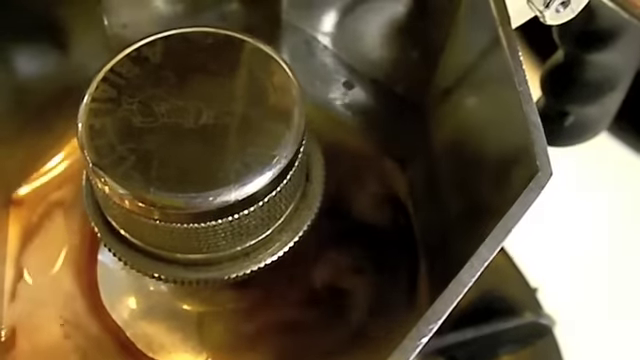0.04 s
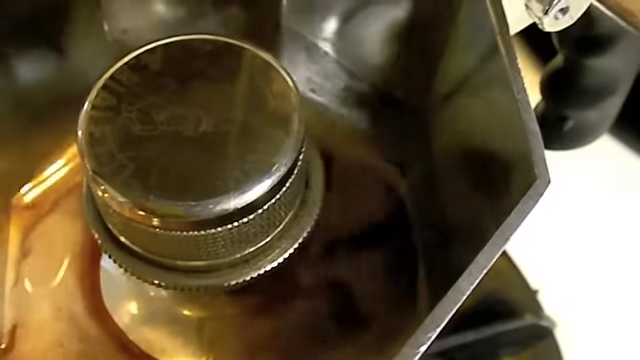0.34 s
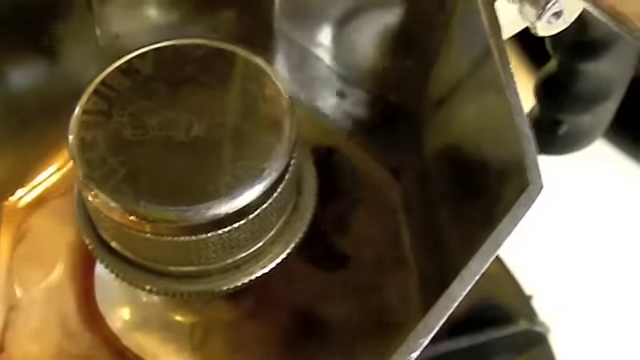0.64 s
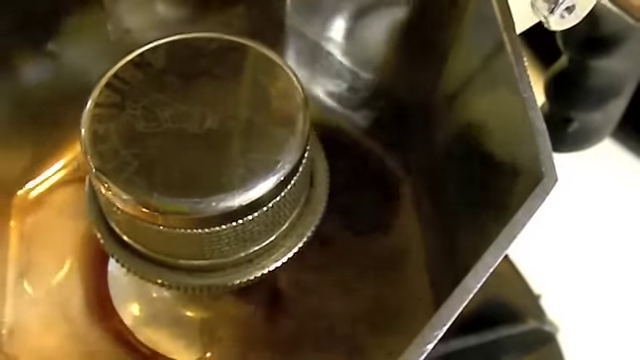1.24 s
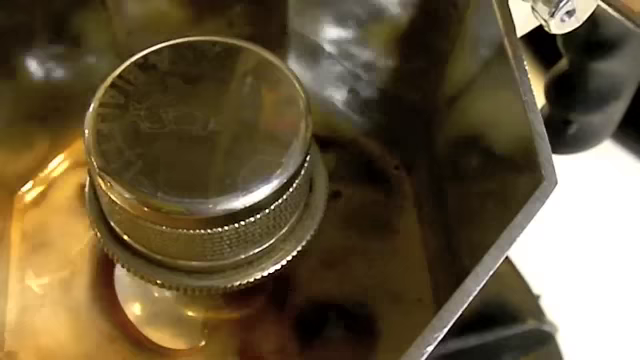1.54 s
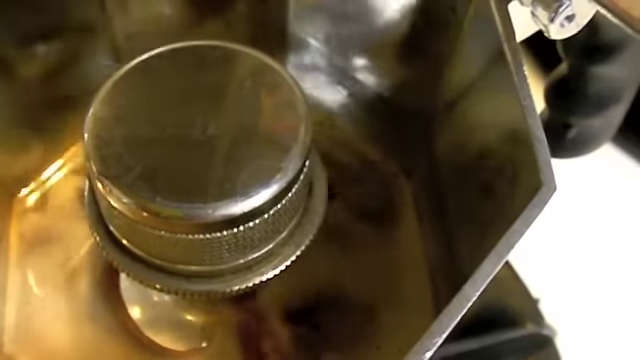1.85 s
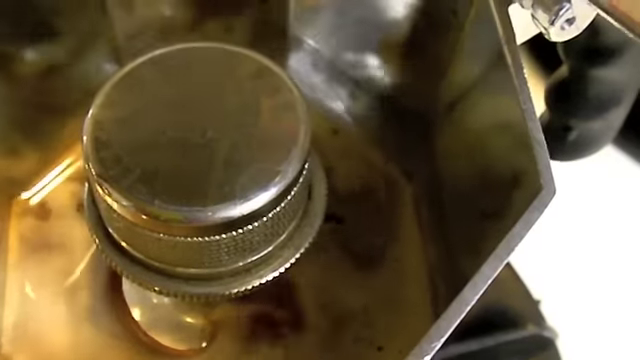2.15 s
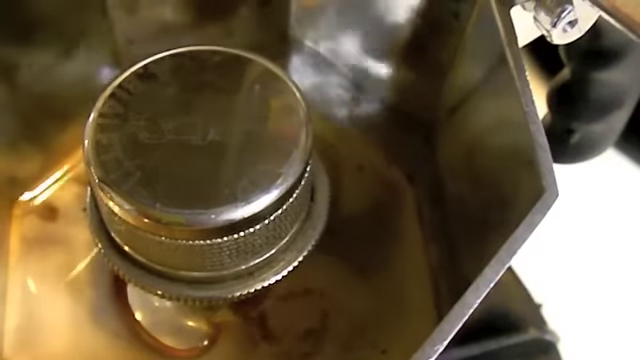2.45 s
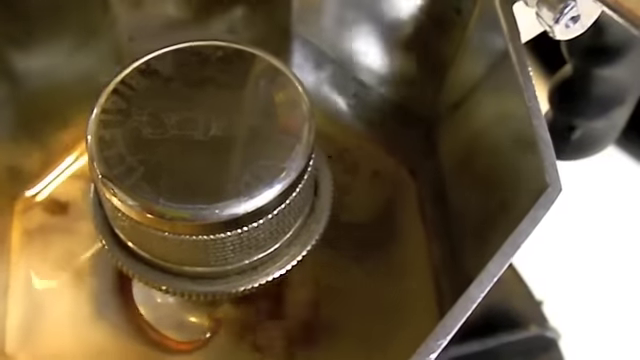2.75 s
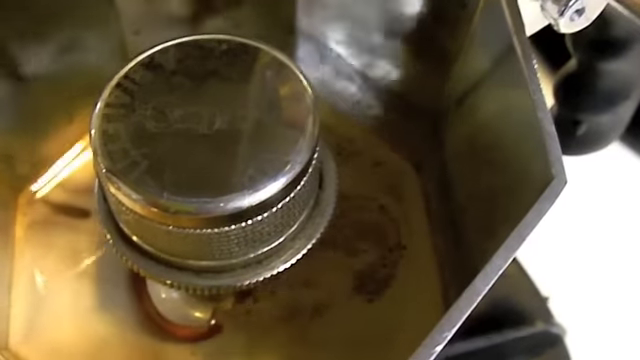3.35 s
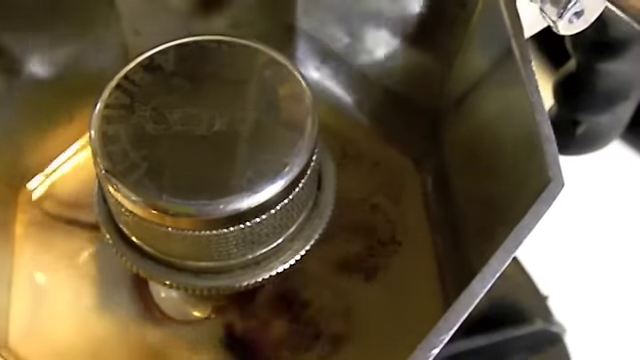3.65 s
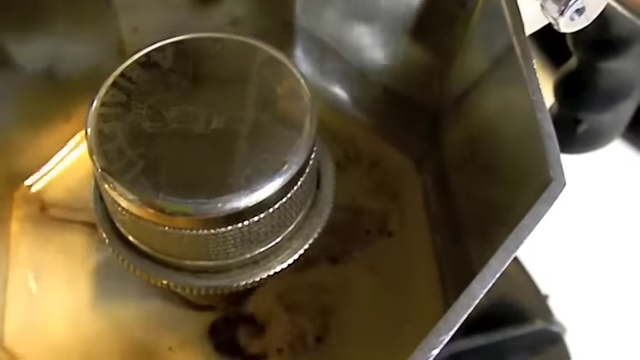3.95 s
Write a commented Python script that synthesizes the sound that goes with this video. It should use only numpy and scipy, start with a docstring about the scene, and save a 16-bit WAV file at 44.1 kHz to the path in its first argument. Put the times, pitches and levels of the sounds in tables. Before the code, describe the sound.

Coffee gurgles and spits in a stovetop pot before easing into a simmering hiss.

```python
"""Bubbles pop and gurgle as slugs of coffee choke the spout of a stovetop pot; spray crackles and
steam squeezes past in hoarse whistles. The last plug of liquid tears with a crack and, after a last
big pop, the spout drains with a rising rush. The steam settles into a steady, simmering hiss.
Heard in a quiet kitchen, from a stereo pair of microphones just above the open lid."""
import sys
import numpy as np
from scipy import signal
from scipy.fft import rfft, irfft
from scipy.io import wavfile
from scipy.ndimage import uniform_filter1d

SR = 44100
rng = np.random.default_rng(int(sys.argv[2]) if len(sys.argv) > 2 else 0)


def file_out(sig):
    """Save sig as 16-bit WAV at sys.argv[1]."""
    # one column per channel
    cols = np.atleast_2d(sig).T
    # limit, then scale
    lim = np.clip(cols, -1, 1)
    pcm = np.round(lim * 32767).astype(np.int16)
    wavfile.write(sys.argv[1], SR, pcm)


N = 176400
TIME, FREQS = np.arange(N) / SR, np.fft.rfftfreq(N, 1 / SR)

# small bubbles between the pops: t/s, level/dB
GURGLE_LEVEL = [(0.0, -25.5), (0.04, -29.5), (0.1, -33), (0.108, -40), (0.144, -29.5), (0.22, -32.5),
                (0.251, -24), (0.267, -36.5), (0.303, -26), (0.315, -40), (0.385, -28), (0.402, -32),
                (0.418, -29), (0.452, -38.5), (0.483, -26), (0.567, -31), (0.583, -26.5), (0.774, -33.5),
                (0.814, -28.5), (0.854, -31.5), (0.91, -29.5), (0.922, -43.5), (0.986, -26), (1.018, -36.5),
                (1.042, -30.5), (1.101, -32.5), (1.185, -26.5), (1.197, -35.5), (1.225, -32), (1.257, -33)]
# resonance of the steam pocket in the spout: t/s, f/Hz
POCKET_PITCH = [(0, 1550), (.1, 1600), (.15, 1940), (.222, 1530), (.33, 2280), (.385, 1750), (.49, 1850),
                (.56, 1580), (.95, 1470), (1.25, 1380)]
# how dry the spout is: t/s, dryness (0-1)
SPOUT_DRYNESS = [(0, 0.7), (.5, 0), (.58, 0.9), (1.1, 0.97), (1.16, 0.6)]
# churning liquid: f/Hz, level/dB
CHURN_SPECTRUM = [(150, -28.5), (290, -4), (600, -7), (720, 2), (2200, 2), (2850, -5), (3150, 2.5),
                  (3600, -2), (4400, -2), (6300, -16.5), (15000, -18)]
# steam squeezing past the liquid: t/s, level/dB
WHISTLE_LEVEL = [(0.0, -35.5), (0.108, -61), (0.14, -40.5), (0.315, -51.5), (0.335, -44.5), (0.459, -54),
                 (0.519, -39), (0.531, -44), (0.595, -28), (0.603, -37), (0.662, -39.5), (0.686, -25),
                 (0.758, -48.5), (0.802, -36), (0.898, -38.5), (0.918, -49), (0.958, -54), (0.966, -31),
                 (0.994, -32.5), (1.01, -40), (1.046, -36), (1.121, -46.5), (1.185, -34), (1.193, -54),
                 (1.217, -60)]
# resonances of the gap it passes through: f/Hz, half-width/Hz, level/dB
GAP_MODES = [(4620, 130, -6.5), (5100, 150, 2.5), (5365, 220, -4.5)]
# atomised coffee: t/s, level/dB
MIST_LEVEL = [(0.5, -51), (0.607, -49), (0.72, -36.5), (0.765, -44), (0.8, -37.5), (0.9, -42), (0.95, -62),
              (0.986, -42), (1.121, -64)]
# its tone: f/Hz, level/dB
MIST_SPECTRUM = [(5500, -42), (8600, -7), (9800, -17), (10800, 4), (11500, 4), (12600, -7), (13300, -9),
                 (14100, -13), (14750, -4), (15100, -2), (15500, -14)]
# jets of wet steam: t/s, length/s, f/Hz, width/Hz, level/dB
STEAM_JETS = [(0, .26, 12800, 1390, -41.5), (0.043, 0.046, 12700, 990, -30.5),
              (0.132, 0.041, 13400, 900, -37.5), (.255, 0.18, 14400, 600, -39.5),
              (0.285, 0.02, 12400, 1900, -31.5), (0.303, 0.11, 10300, 1300, -42.5),
              (.465, 0.05, 14000, 600, -36), (1.151, 0.019, 12200, 1300, -36),
              (1.172, 0.018, 12400, 1510, -24.5)]
# steady steam: t/s, level/dB
HISS_LEVEL = [(0, -48), (1.15, -37), (1.27, -35), (1.6, -35), (2.3, -35.5), (2.6, -33), (2.75, -35),
              (3.3, -34.5), (4, -35)]
# its tone: f/Hz, level/dB
HISS_SPECTRUM = [(40, -52), (120, -34.5), (190, -18), (280, -8.5), (600, -7), (720, 1), (1150, -2.5),
                 (1400, 1.5), (1900, -0.5), (3200, -5.5), (4200, -12), (5500, -12.5), (6600, -10.5),
                 (7300, -23), (8900, -17.5), (12500, -18), (15000, -37)]
# extra wet steam as the spout clears: t/s, level/dB
WET_SURGE_LEVEL = [(0, -71), (1.18, -71), (1.25, -28.5), (1.45, -31.5), (1.6, -30.5), (1.85, -33),
                   (2.1, -36), (2.35, -39), (2.7, -77), (4, -72)]
# its tone: f/Hz, level/dB
WET_SURGE_SPECTRUM = [(60, -55), (300, -26), (500, -21), (800, -13), (950, -7.5), (1330, -2.5), (1700, -6),
                      (1950, -9), (5200, -15.5), (7000, -29.5), (10000, -24), (12800, -22.5), (14000, -47)]
# air resonances of the open pot: f/Hz, half-width/Hz, boost/dB
POT_AIR_MODES = [(286, 12, 7), (411, 18, 5), (492, 33, 4), (721, 17, 7), (996, 90, 5.5), (1321, 82, 6.5),
                 (1475, 25, 5.5), (1712, 25, 6.5), (3230, 51, 6), (3764, 28, 7.5), (5210, 60, 5),
                 (6030, 24, 11.5)]
# bands in which the froth fizzes: f/Hz
FROTH_BANDS = [2460, 4600, 6730, 8620, 10920, 13300]
# flurries of fine droplets: t/s, half-length/s, f/Hz, relative half-width, level/dB
DROPLET_FLURRIES = [(2.635, 0.005, 3150, 0.083, -33), (2.964, 0.023, 9200, 0.47, -45),
                    (3.366, 0.0094, 3730, 0.091, -35), (3.468, 0.021, 5200, 0.15, -39),
                    (3.876, 0.14, 11100, 0.14, -46.5)]
# room tone: f/Hz, level/dB
KITCHEN_SPECTRUM = [(55, -36), (75, 3.5), (95, -1), (165, -2.5), (195, 14), (230, -38), (2000, -50)]
# large bubbles bursting at the spout: t/s, ring level/dB, f/Hz, decay/s, snap level/dB
LARGE_BUBBLES = [(0.0161, -12.5, 1500, 0.0018, -33), (0.074, -23, 1760, 0.0021, -17),
                 (0.0814, -13.5, 1650, 0.0015, -11), (0.085, -11.5, 1620, 0.0011, -15),
                 (0.1425, -9, 1640, 0.0005, -33), (0.154, -16, 1770, 0.0005, -18),
                 (0.1612, -8, 1810, 0.0005, -16), (0.228, -7.5, 1590, 0.00071, -22),
                 (0.2499, -15, 2070, 0.00054, -27), (0.2729, -10, 2080, 0.00041, -10),
                 (0.2953, -14, 2210, 0.00042, -15), (0.3043, -10.5, 2010, 0.00041, -19),
                 (0.3507, -18, 2430, 0.0005, -22), (0.393, -12, 2010, 0.00034, -11),
                 (0.4214, -11, 1750, 0.00038, -11.5), (0.4317, -14.5, 1940, 0.00042, -14),
                 (0.4589, -14.0, 1810, 0.00056, -16), (0.5, -7.5, 1930, 0.0006, -19),
                 (0.52, -12.0, 1820, 0.00061, -41), (0.5578, -11, 1640, 0.0009, -31),
                 (0.579, -9.5, 1620, 0.0011, -32), (0.603, -15.5, 1680, 0.001, -30),
                 (0.6225, -15, 1500, 0.0012, -25), (0.6352, -10.5, 1770, 0.00028, -16),
                 (0.7362, -4.5, 1510, 0.00066, -12), (0.9063, -5.0, 1660, 0.00087, -24),
                 (1.0007, -6.5, 1540, 0.0014, -25), (1.2175, -5.5, 1440, 0.0019, -12),
                 (1.2198, -7.5, 1490, 0.0012, -25), (1.2749, -9.5, 1920, 0.0004, -26),
                 (1.4516, -14.5, 1570, 0.00057, -34), (2.3733, -18, 1190, 0.00059, -49),
                 (3.6832, -12.5, 1360, 0.001, -34)]
# snap of a bubble's film: f/Hz, level/dB
FILM_SPECTRUM = [(500, -29), (3000, 0), (4500, 4), (6500, -18), (10000, -3), (12000, 7), (14500, 7.5)]
# resonance of the draining spout: t/s, f/Hz, level/dB
DRAIN_SWEEP = [(1.21, 1200, -51), (1.25, 1400, -40), (1.31, 1800, -30), (1.35, 2200, -27),
               (1.38, 2810, -35.5), (1.4, 3500, -24), (1.42, 4550, -44), (1.48, 6000, -41),
               (1.6, 6500, -58)]
# the flow that excites it: f/Hz, level/dB
FLOW_SPECTRUM = [(400, -39), (1000, 2.5), (7000, 2), (11000, 11)]
# likeness of the two microphones: f/Hz, correlation (0-1)
MIC_LIKENESS = [(300, 0.95), (1300, 1), (2500, 0.91), (4500, 0.6), (8000, 0.63), (13000, 0.29)]
# left microphone minus right: f/Hz, level/dB
MIC_BALANCE = [(300, 0.3), (4000, 0.6), (9000, -0.5), (14000, 2.5)]

CLEAR_DB_PER_S = 160  # how fast the sputtering dies once the spout is clear


def amp(db):
    """Decibels to gain."""
    return 10 ** (np.asarray(db) / 20)


def unit(x):
    """Scales to rms 1."""
    return x / np.sqrt(np.mean(x ** 2) + 1e-20)


def curve(points, column=1):
    """A control curve at every sample."""
    points = np.array(points)
    return np.interp(TIME, points[:, 0], points[:, column])


def sputter(points, column=1):
    """Gain along a level curve that dies away after its last point."""
    return amp(curve(points, column) - CLEAR_DB_PER_S * np.maximum(TIME - points[-1][0], 0))


def spectrum(points):
    """A table read on a log-frequency axis."""
    hz, value = np.transpose(points)
    return np.interp(np.log(FREQS + 1), np.log(hz), value)


def peak(hz, half_width_hz):
    """Gain of a resonance at every frequency."""
    return 1 / (1 + ((FREQS - hz) / half_width_hz) ** 2)


def add(mix, start_s, sound):
    """Mixes a sound in at its start time."""
    part = mix[..., max(round(start_s * SR), 0):][..., :sound.shape[-1]]
    part += sound[..., :part.shape[-1]]


def flutter(rate_hz, depth_db):
    """Random gain that wavers up to a rate."""
    slow = irfft(rfft(rng.standard_normal(N)) / (1 + (FREQS / rate_hz) ** 4), N)
    return amp(depth_db * unit(slow))


def noise():
    """Two independent streams of white noise."""
    return rng.standard_normal((2, N))


def fizz(per_s, spread_db, share):
    """Two streams of noise, with a share of their power in tiny bursts of uneven size."""
    sizes = amp(spread_db * np.minimum(rng.exponential(1, N), 4))
    bursts = sizes * (rng.random(N) < per_s / SR)
    return np.sqrt(1 - share) * noise() + np.sqrt(share) * unit(bursts * rng.choice([-1, 1], (2, N)))


def at_mics(pair, gain):
    """Filters two streams and spreads them over the microphones, at rms 1."""
    likeness, lean = spectrum(MIC_LIKENESS), amp(spectrum(MIC_BALANCE) / 2)
    mid, side = rfft(pair) * gain * np.sqrt([1 + likeness, 1 - likeness])
    return unit(irfft(np.array([(mid + side) * lean, (mid - side) / lean]), N))


def radiate(x, low_hz=550, high_hz=5000):
    """The small pocket radiates little bass and little treble."""
    return signal.sosfilt(signal.butter(2, [low_hz, high_hz], "band", fs=SR, output="sos"), x)


def bubble(hz, rise_s, decay_s, sag=0.073, sag_s=0.0013):
    """A burst bubble: the pocket swells, rings a few cycles and sags in pitch."""
    t = np.arange(500) / SR
    pitch = hz * (1 + sag * (2 * np.exp(-t / sag_s) - 1))
    envelope = (1 - np.exp(-(t / rise_s) ** 2)) * np.exp(-t / decay_s)
    return -envelope / envelope.max() * np.sin(2 * np.pi * np.cumsum(pitch) / SR)


def gurgle():
    """Small bubbles ring around the pocket's pitch in churning liquid; steam makes the pocket sing."""
    dryness = curve(SPOUT_DRYNESS)
    bursting = rng.random(N) < 1000 / SR  # about 1000 bubbles a second
    size_db = 3 * np.minimum(rng.exponential(1, N), 3)
    scatter = 0.17 * (1 - 0.48 * dryness)  # the pitches draw together as the spout dries
    hz = curve(POCKET_PITCH) * np.exp(scatter * rng.standard_normal(N))
    crowd = np.zeros(N)
    for i in np.flatnonzero(bursting & (TIME < 2)):
        add(crowd, i / SR, amp(size_db[i]) * bubble(hz[i], rise_s=0.0003, decay_s=0.00086))
    crowd = radiate(crowd)
    crowd /= np.sqrt(abs(uniform_filter1d(crowd ** 2, size=1300)) + 1e-4)  # evens out the loudness
    churn = at_mics(fizz(per_s=900, spread_db=7.4, share=0.55), amp(spectrum(CHURN_SPECTRUM)))
    singing = dryness * at_mics(noise(), peak(hz=1460, half_width_hz=100))
    return sputter(GURGLE_LEVEL) * (amp(-2.5) * crowd + amp(-6.5) * churn + amp(0.5) * singing)


def whistle():
    """Turbulent steam excites the narrow gap beside the liquid."""
    gap = sum(amp(db) * peak(hz, width) for hz, width, db in GAP_MODES)
    return sputter(WHISTLE_LEVEL) * flutter(rate_hz=79, depth_db=3.6) * at_mics(noise(), gap)


def spray():
    """Atomised coffee crackles, and jets of wet steam each sizzle at their own pitch."""
    mist = sputter(MIST_LEVEL) * at_mics(fizz(3200, 2.4, 0.41), amp(spectrum(MIST_SPECTRUM)))
    for start, length, hz, width, db in STEAM_JETS:
        inside_s = np.minimum(TIME - start, start + length - TIME)
        gate = np.clip(inside_s / 0.0045 + 0.5, 0, 1)
        mist += amp(db) * gate * at_mics(noise(), peak(hz, 2 * width) ** 2)
    return mist * flutter(rate_hz=330, depth_db=3.4)


def steam(choke_below_db=-27.5):
    """Free steam in the ringing pot: choked by liquid at first, then a wet surge and a steady hiss."""
    pot_db = sum(db * peak(hz, width) for hz, width, db in POT_AIR_MODES)
    hiss_gain = amp(curve(HISS_LEVEL)) * flutter(rate_hz=28, depth_db=1.0)
    hiss = at_mics(fizz(1500, 2.7, 0.32), amp(spectrum(HISS_SPECTRUM) + pot_db))
    surge_gain = amp(curve(WET_SURGE_LEVEL)) * flutter(rate_hz=75, depth_db=1.55)
    surge = at_mics(fizz(600, 2.1, 0.42), amp(spectrum(WET_SURGE_SPECTRUM) + pot_db))
    # until the spout clears, the hiss dips whenever the gurgle is weak
    plugged = np.clip((GURGLE_LEVEL[-1][0] - TIME) * 20, 0, 1)
    choke_db = 0.9 * plugged * np.minimum(curve(GURGLE_LEVEL) - choke_below_db, 0)
    return hiss_gain * amp(choke_db) * hiss + surge_gain * surge


def froth():
    """Froth bursts in flickering patches, with a few denser flurries of droplets."""
    fizzing = np.zeros((2, N))
    for hz in FROTH_BANDS:
        flicker = amp(-61) * flutter(rate_hz=14, depth_db=4.5)
        fizzing += flicker * at_mics(fizz(500, 7.4, 0.69), peak(hz, 0.035 * hz))
    for centre, half_length, hz, width, db in DROPLET_FLURRIES:
        swell = amp(db) * np.exp(-2 * ((TIME - centre) / half_length) ** 2)
        fizzing += swell * at_mics(fizz(400, 1, 0.86), peak(hz, width * hz))
    return fizzing


def kitchen():
    """Faint, low room tone around the stove."""
    return amp(-70.5) * at_mics(noise(), amp(spectrum(KITCHEN_SPECTRUM)))


def pops(snap_decay_s=0.00085):
    """Just below the microphones, each large bubble snaps its film and rings the pocket."""
    rings, snaps = np.zeros(N), np.zeros(N)
    t = np.arange(300) / SR
    for start, ring_db, hz, decay_s, snap_db in LARGE_BUBBLES:
        add(rings, start, amp(ring_db) * bubble(hz, rise_s=0.00054, decay_s=decay_s))
        add(snaps, start, amp(snap_db) * np.exp(-t / snap_decay_s))
    film = at_mics(noise(), amp(spectrum(FILM_SPECTRUM)))
    return radiate(rings) + 0.5 * snaps * film


def crack(start_s=1.1886, hz=3420):
    """The last plug of liquid tears with a sharp crack."""
    t = np.arange(300) / SR
    ring = -np.exp(-t * hz) * np.sin(2 * np.pi * hz * t)
    tear = np.zeros(N)
    add(tear, start_s, amp(-6.5) * radiate(ring, low_hz=700, high_hz=7050))
    return tear


def drain(bandwidth_hz=1730):
    """Crackling flow through a resonance that climbs as the last liquid leaves."""
    flow = at_mics(fizz(1100, 2.2, 0.41), amp(spectrum(FLOW_SPECTRUM)))
    sweep = np.exp(2j * np.pi * np.cumsum(curve(DRAIN_SWEEP)) / SR)
    pole = np.exp(-np.pi * bandwidth_hz / SR)
    # shift down, low-pass, shift back up: a resonance that follows the sweep
    lowered = signal.lfilter([1], [1, -2 * pole, pole ** 2], flow / sweep)
    rush = (sweep * lowered).real
    return unit(rush) * sputter(DRAIN_SWEEP, column=2)


def echoes(x, t60_s, delay_s, width):
    """Dense reflections that die away, partly different at each microphone."""
    t = np.arange(SR // 2) / SR
    mid, side = rng.standard_normal((2, len(t))) * amp(-60 * t / t60_s) * (t > delay_s)
    tail = np.array([mid + width * side, mid - width * side])
    return signal.fftconvolve(x, tail / np.linalg.norm(tail[0]), axes=1)[:, :N]


def scene():
    """Close over the lid: pops echo in the pot, the spout in the kitchen, over steam and room tone."""
    bursts = pops() + crack()
    pot_echo = amp(-12.5) * echoes(bursts, t60_s=0.0037, delay_s=0.00066, width=0.064)
    spout = bursts + pot_echo + gurgle() + spray() + whistle() + drain()
    room_tone = kitchen()
    room_echo = amp(-12) * echoes(spout, t60_s=0.084, delay_s=0.0024, width=0.24)
    return spout + room_echo + steam() + froth() + room_tone


def record(dry):
    """The microphones have a deep notch in the treble, and the band ends at 15.6 kHz."""
    notch = 1 - peak(hz=7930, half_width_hz=510)
    heard = irfft(rfft(dry) * notch, N)
    low_pass = signal.firwin(255, 15600, window=("kaiser", 9), fs=SR)
    return signal.oaconvolve(heard, low_pass[None], "same")


dry = scene()
out = record(dry)
file_out(out)
```